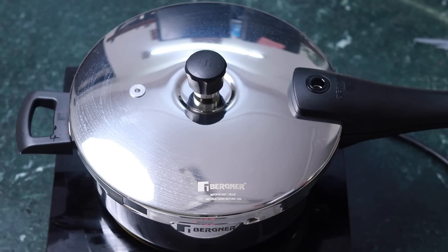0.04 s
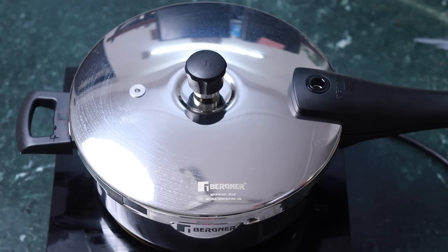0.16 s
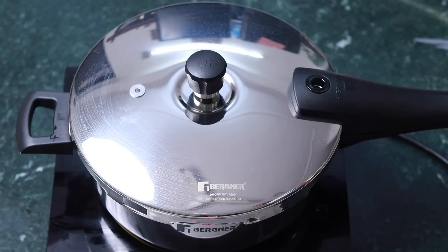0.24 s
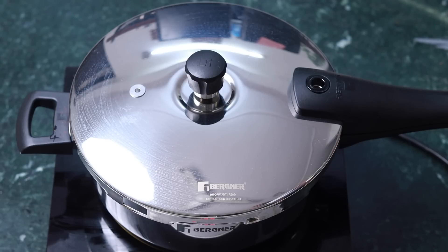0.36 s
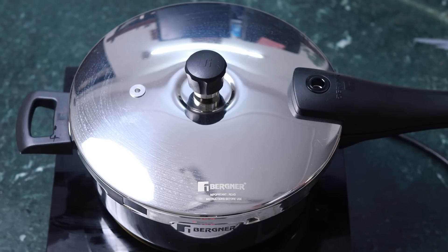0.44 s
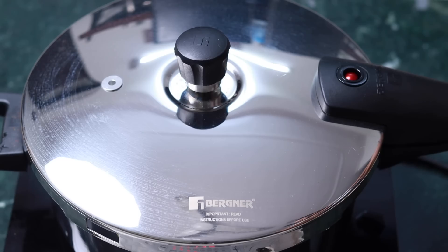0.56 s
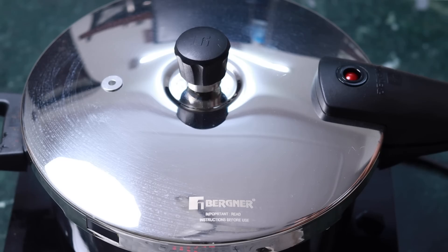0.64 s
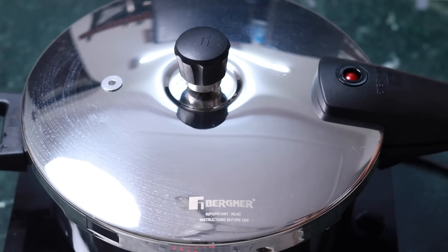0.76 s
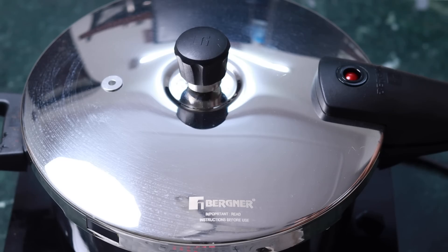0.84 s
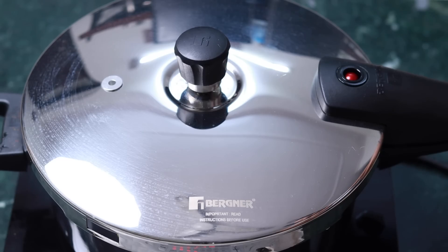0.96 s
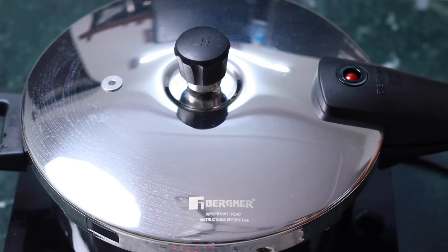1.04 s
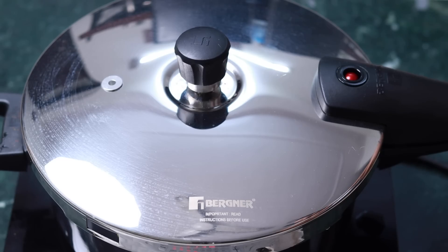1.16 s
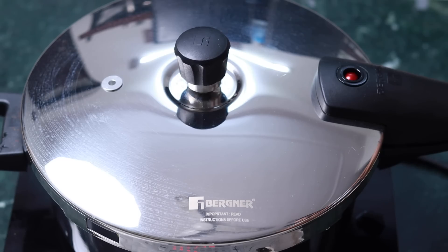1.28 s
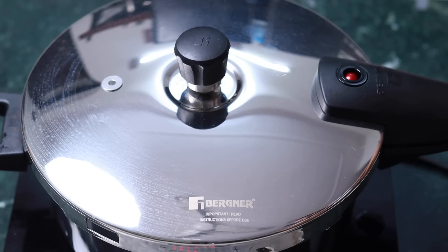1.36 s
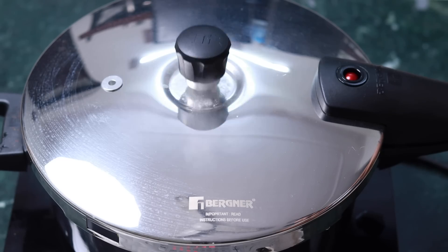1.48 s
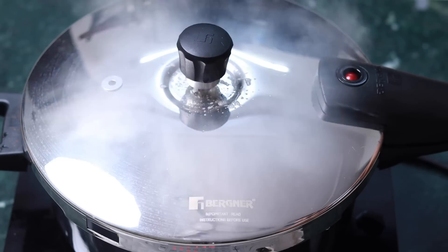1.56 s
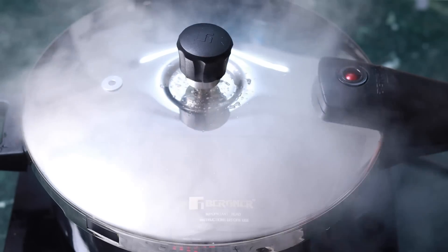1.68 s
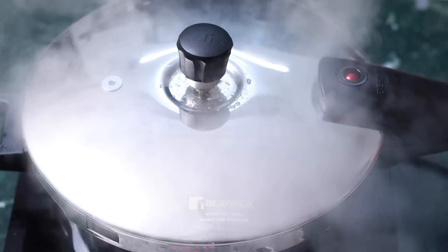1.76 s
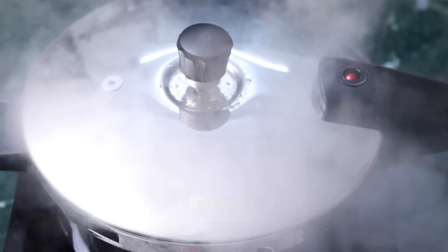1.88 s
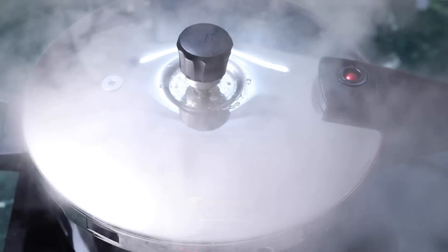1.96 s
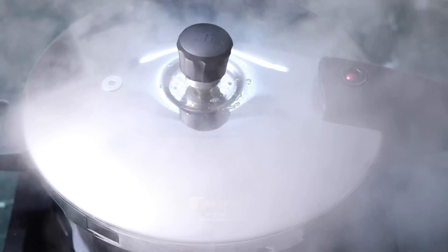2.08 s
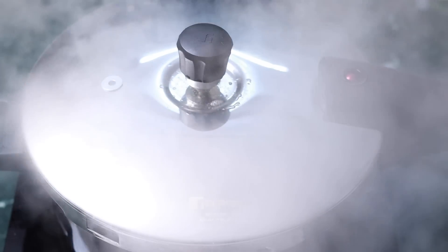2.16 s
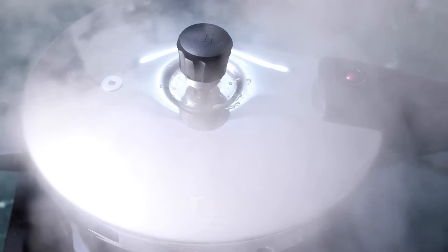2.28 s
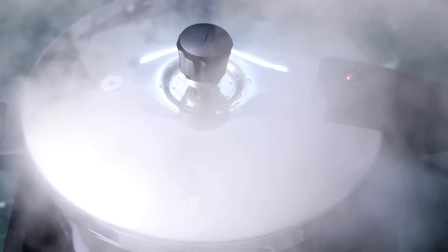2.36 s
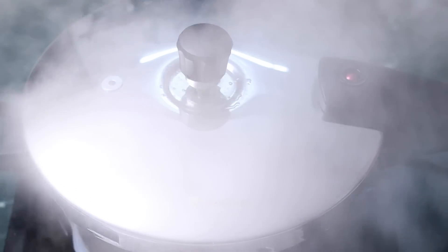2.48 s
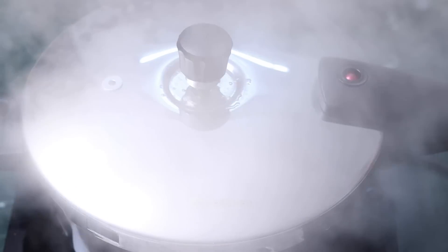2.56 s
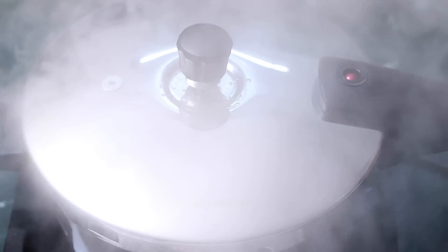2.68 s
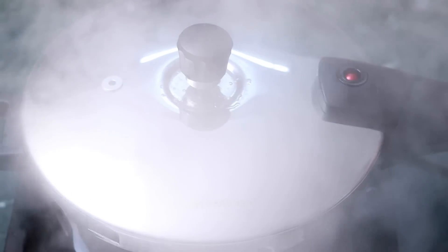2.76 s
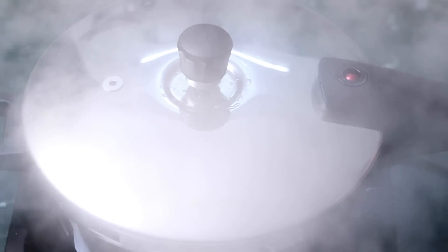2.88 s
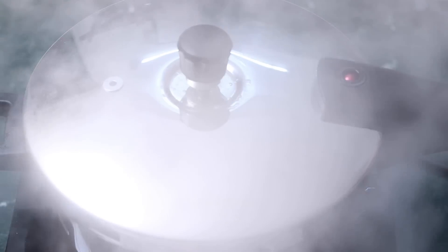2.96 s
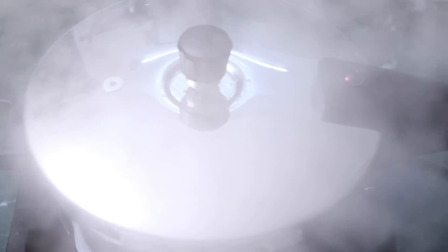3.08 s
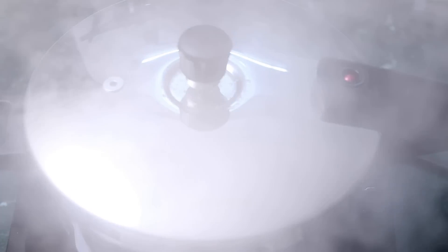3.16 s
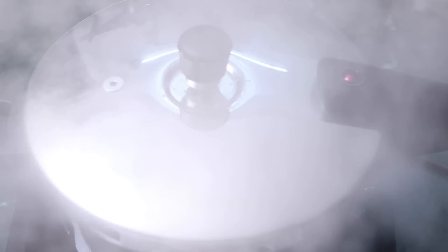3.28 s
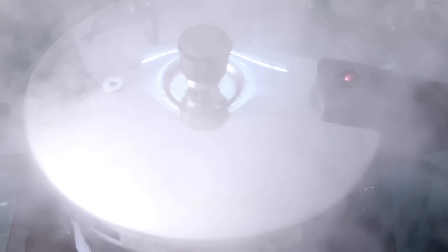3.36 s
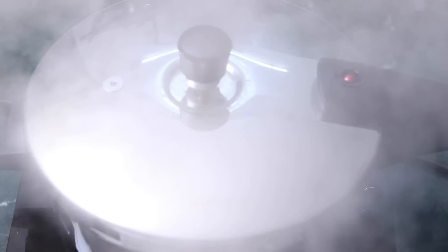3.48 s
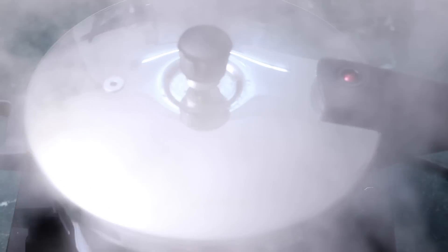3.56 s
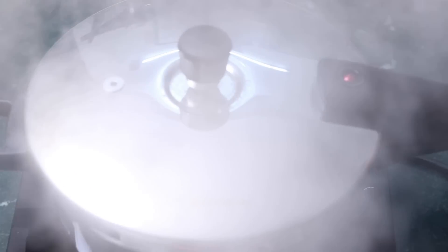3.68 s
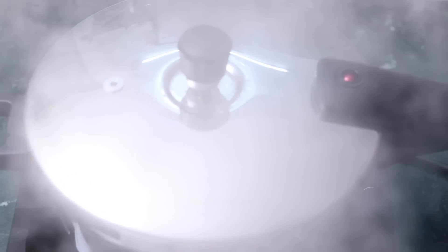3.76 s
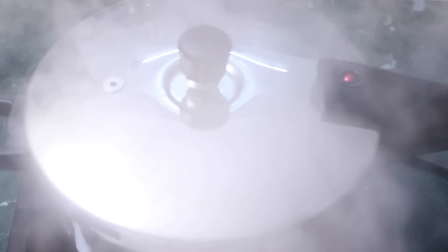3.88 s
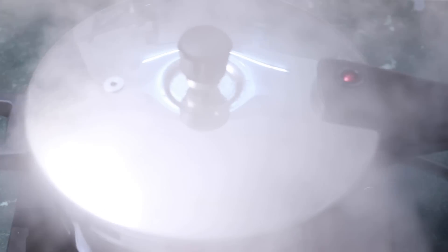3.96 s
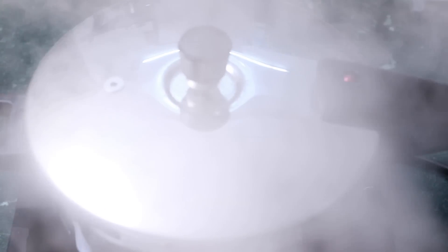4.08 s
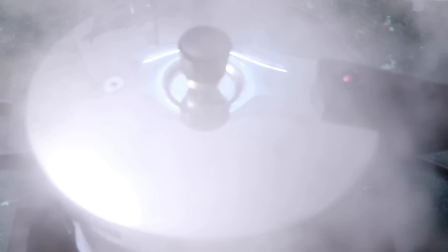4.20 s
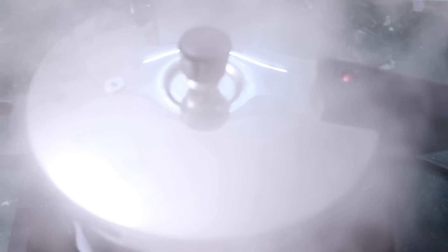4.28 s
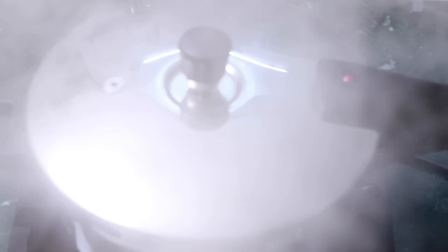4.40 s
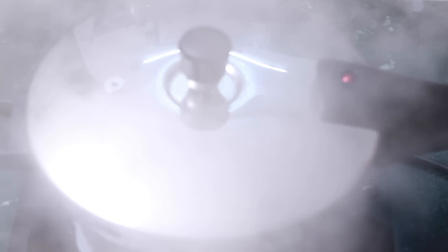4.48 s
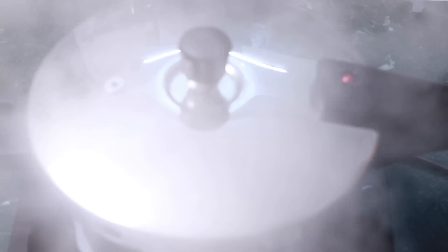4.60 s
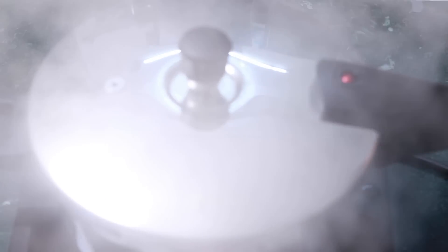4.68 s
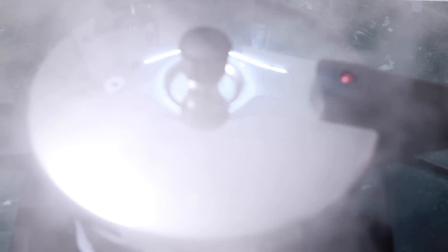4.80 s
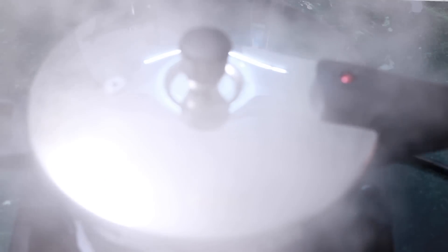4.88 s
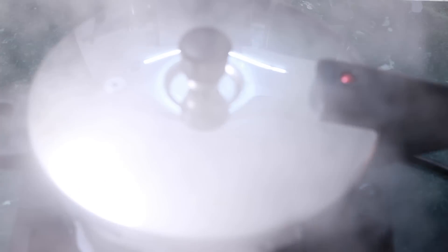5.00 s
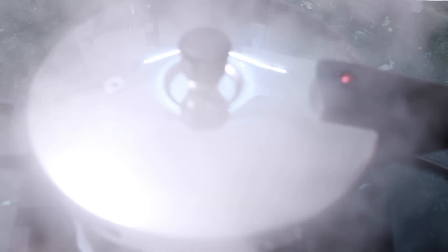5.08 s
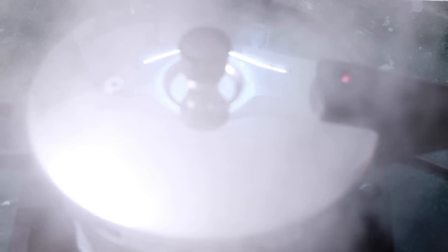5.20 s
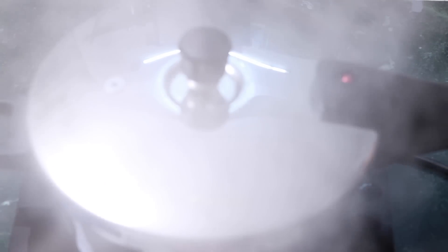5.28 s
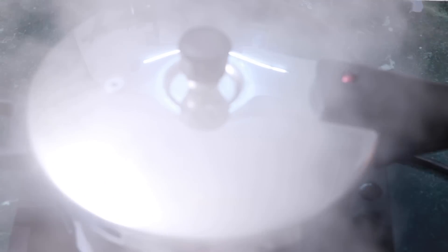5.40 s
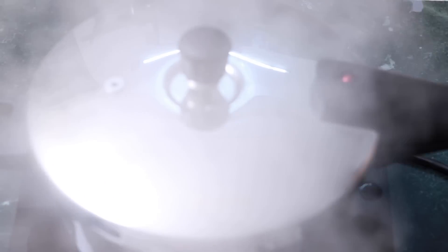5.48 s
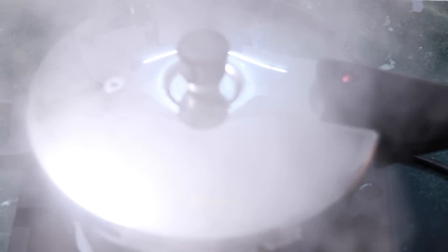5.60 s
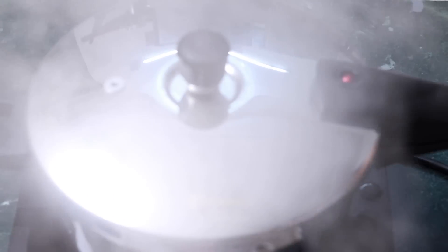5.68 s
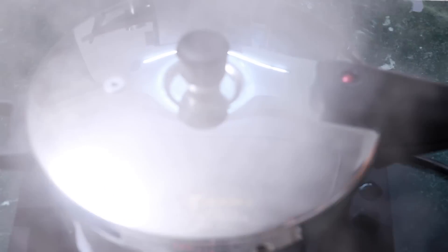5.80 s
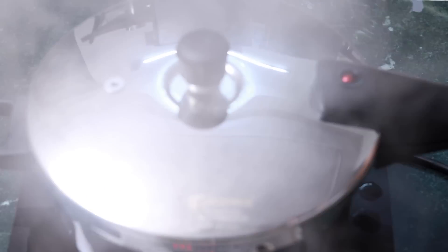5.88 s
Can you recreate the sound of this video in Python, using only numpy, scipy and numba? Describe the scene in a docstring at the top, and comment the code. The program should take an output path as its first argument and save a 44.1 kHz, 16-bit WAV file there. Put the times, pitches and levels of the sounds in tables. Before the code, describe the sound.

A pressure cooker valve gives small wet spits and thin puffs over the soft rush of a hob fan. With a dull metal knock it opens into a loud, bright hiss of steam, steady in level but changing colour a few times. After four seconds a quick metallic chatter shuts it off. The microphone is close over the lid, with a short echo from hard kitchen walls.

```python
"""A hob's fan rushes softly in a small kitchen, heard from close above the lid of a pressure cooker.
Wet steam spits past the weight that sits on the valve, until the weight lifts with a knock and a loud
jet blows for four seconds. The weight slowly turns, which shifts the hiss; then it rattles back onto
its seat and the jet dies away. The fan runs throughout."""
import sys
import numpy as np
from scipy import signal
from scipy.fft import rfft, irfft
from scipy.io import wavfile
from scipy.ndimage import uniform_filter1d
from numba import njit

SR = 44100
rng = np.random.default_rng(int(sys.argv[2]) if len(sys.argv) > 2 else 0)


def to_wav(sig):
    """Store sig (one row per channel, or 1-D mono) as 16-bit WAV at the path in sys.argv[1].

    Samples outside -1..1 are clipped; the rate is SR.
    """
    pcm = np.clip(np.atleast_2d(sig), -1, 1) * 32767
    pcm = np.round(pcm).astype(np.int16)
    wavfile.write(sys.argv[1], SR, pcm.T)  # frames by channels


N = 261938
TIME = np.arange(N) / SR

# Levels in the tables are relative: each layer gets its overall loudness later.
# The rush of the fan's draught and the boil: (pitch [Hz], level [dB])
HOB_RUSH = [(25, -35), (45, -24), (75, -8), (200, -6.5), (330, -1.5), (470, 5), (650, -3), (900, -6.5),
            (1250, -6), (2200, -14), (4000, -20.5), (8000, -33), (11000, -39.5), (15500, -61)]
# Hums of the pot and the hob: (pitch [Hz], width [Hz], level [dB])
HOB_HUMS = [(244.2, 8.6, -21.5), (419.9, 30, -3.5), (791, 5.7, -16.5)]
# Puffs of steam that nudge the weight, the last one lifting it: (time [s], level [dB])
STEAM_PUFFS = [(.385, -61), (.9, -55), (.965, -49), (1.16, -40), (1.29, -51), (1.56, -22.5)]
# Water spat through the seat, the rim that the weight rests on: (time [s], level [dB])
WATER_SPITS = [(.4773, -33), (.4847, -35), (.4974, -39), (.7188, -38), (.7344, -38), (.8734, -32),
               (.8934, -33), (1.1034, -38), (1.1314, -32), (1.1415, -29), (1.2795, -29.5), (1.293, -28),
               (1.4222, -36)]
# The broad hiss of the nearly closed seat: (pitch [Hz], level [dB])
LEAK_HISS = [(120, -40), (500, -3), (2200, -15), (3600, -29), (4500, -6), (6000, -5.5), (8200, -0.5),
             (10000, -22), (12800, -13), (15500, -24)]
# Pitches at which the seat rings: (pitch [Hz], width [Hz], steam level [dB], spit level [dB])
SEAT_RINGS = [(3050, 600, -4.5, 4.5), (3360, 650, -4.5, -3), (6440, 820, -3.5, -20)]
# The jet's roar at the weight's first, middle and last position: (pitch [Hz], level [dB])
ROAR_FIRST = [(100, -38), (500, -17), (1200, -9.5), (1900, -8), (2200, -8.5), (2480, -7), (2750, 2),
              (4600, 1), (5700, 1), (8000, -2.5), (10100, -13), (11400, -11.5), (12400, -6), (15500, -9)]
ROAR_MIDDLE = [(100, -32), (450, -16), (1050, -12.5), (1470, -18.5), (1780, -7.5), (2300, -3.5), (2850, -2),
               (4400, -6), (5700, 0), (7800, -2), (8800, -14.5), (10500, -14), (13400, -7.5),
               (15500, -13.5)]
ROAR_LAST = [(100, -41), (450, -20), (1000, -11), (1450, -18), (1780, -8.5), (2300, -6.5), (2800, 1.5),
             (4400, 1.5), (6100, 3.5), (7500, -2.5), (8700, -7), (10200, -13), (13400, -7), (15500, -13)]
# Narrow rings of the gap under the weight at those positions: (pitch [Hz], width [Hz], level [dB])
GAP_RINGS_FIRST = [(2755, 70, -23.5), (4460, 360, -10.5), (4950, 400, -11.5)]
GAP_RINGS_MIDDLE = [(2660, 190, -13.5), (3017, 210, -8.5), (4705, 120, -13.5), (5440, 360, -19),
                    (7550, 520, -12)]
GAP_RINGS_LAST = [(1815, 260, -23), (2840, 170, -32), (5900, 550, -19), (7160, 120, -12)]
# The gap's two broad rings and a dip in its hiss, one row for each position:
# (low pitch [Hz], low level [dB], high pitch [Hz], high level [dB], dip pitch [Hz], dip depth [0-1])
GAP_SHAPES = [(3320, -3.5, 6870, -2.5, 4000, 0.35), (3720, -4.5, 7100, -8.5, 4860, 0.18),
              (3570, -5, 6640, -17, 5300, .25)]
# The weight hits its stop, and later chatters back down: (time [s], level [dB])
WEIGHT_KNOCKS = [(1.569, -12), (5.61, -22), (5.634, -21), (5.655, -15), (5.679, -19), (5.699, -20),
                 (5.721, -27), (5.741, -27)]
# The notes of the weight and lid: (pitch [Hz], level [dB], time to fade by 60 dB [s])
LID_NOTES = [(279, -24, 0.18), (354, -5, 0.026), (473, -9, 0.12), (590, 4, 0.011), (758, -5, 0.15),
             (817, -4.5, 0.099), (1015, -12, 0.046), (1236, -15.5, 0.23), (1537, -11, 0.07)]
# Each turn carries the weight to its next position: (time at mid-turn [s], easing time [s])
WEIGHT_TURNS = [(3.43, 0.17), (4.64, 0.033)]
# The weight tilts on the jet for a moment: (time [s], half length [s], extra flow [dB],
# pitch rise [fraction], extra low ring [dB], extra high ring [dB])
WEIGHT_TILTS = [(3.3, 0.34, 0.8, .005, -1, 4), (3.544, 0.071, -0.7, 0.061, 2.5, 2),
                (3.71, 0.084, 0, 0.036, 3.5, -9), (5.58, 0.022, 0, 0.085, 2.5, -3)]

HOB_DB, HOB_SWELL_S, HOB_SWELL_DB = -43, 0.56, 7.5  # the hob swells at first, then holds
FAN_HZ, FAN_DB, HUM_SWELL_DB = 732, -10.5, 20
SEAL_S, SEEP_DB = 0.45, -67.5  # once the pot seals, steam seeps under the weight
PUFF_RISE_DB_PER_S, PUFF_FALL_DB_PER_S = 205, 252
SPRAY_PER_S, SPRAY_DB = 45, -65
OPEN_S, OPEN_RISE_S, JET_DB = 1.551, 0.018, -16
CLOSE_S, CLOSE_DB_PER_S = 5.619, 320
ROCKING = 0.013  # the weight rocks, so the broad rings waver by this fraction of their pitch
BLAST_CUT_DB, SETTLE_S = 3, 0.46  # the broad rings start weaker and grow as the weight settles
LOUD_DB, SQUEEZE_RATIO, TURN_DOWN_S, RECOVER_S = -24, 2.45, 0.25, 0.86  # automatic volume control
TOP_HZ = 15600


def undb(db):
    """Turn decibels into a number to multiply by."""
    return 10 ** (np.asarray(db) / 20)


def unit(x):
    """Scale a signal to an average strength (rms) of 1."""
    return x / np.sqrt(np.mean(x ** 2))


def noise():
    """White noise: an even hiss."""
    return rng.standard_normal(N)


def walk(rate):
    """Glide to a new random value `rate` times a second; the typical size is 1."""
    hold = max(int(SR / rate), 1)
    return unit(uniform_filter1d(noise()[np.arange(N) // hold], hold))


def step(s, rise_s):
    """A smooth step from 0 to 1 around time s."""
    return .5 + .5 * np.tanh((TIME - s) / (2 * rise_s))


def bump(s, half_s):
    """A smooth swell from 0 to 1 and back around time s."""
    return np.exp(-((TIME - s) / half_s) ** 2)


def bursts(rows, decay_s):
    """A loudness curve that jumps at each (time [s], level [dB]) and dies away."""
    return sum(undb(db) * (TIME >= s) * np.exp(-np.abs(TIME - s) / decay_s) for s, db in rows)


def colour(x, points):
    """Shape the tone of x along a curve of (pitch [Hz], level [dB]) points."""
    hz, db = np.transpose(points)
    size = 4096
    bins = np.maximum(np.fft.rfftfreq(size, 1 / SR), 1)
    gain = undb(np.interp(np.log(bins), np.log(hz), db))
    cepstrum = irfft(np.log(gain))
    cepstrum[1:size // 2] *= 2  # fold it so the filter never sounds ahead of its input
    cepstrum[size // 2 + 1:] = 0
    return signal.fftconvolve(x, irfft(np.exp(rfft(cepstrum))))[:N]


@njit
def band_pass(x, hz, width):
    """Keep the part of x near a pitch that may move (a state-variable filter)."""
    y, band, low = np.empty(len(x)), 0., 0.
    for i in range(len(x)):
        tuning, damping = np.tan(np.pi * hz[i] / SR), width / hz[i]
        swing = (band + tuning * (x[i] - low)) / (1 + tuning * (tuning + damping))
        band, low = 2 * swing - band, low + 2 * tuning * swing
        y[i] = damping * swing
    return y


def resonate(x, hz, width):
    """Make x ring around one pitch by filtering it twice."""
    centre = hz * np.ones(N)
    return band_pass(band_pass(x + 1e-18, centre, float(width)), centre, float(width))


def hob():
    """Draught and boil make a soft rush with the fan blades' tone in it; a hum rises as the pot seals."""
    rush = unit(colour(noise(), HOB_RUSH)) * undb(0.23 * walk(24))
    hum = sum(undb(db) * unit(resonate(noise(), hz, width)) for hz, width, db in HOB_HUMS)
    hum = hum * undb(-HUM_SWELL_DB * (1 - step(SEAL_S, rise_s=0.02)))
    blade_hz = FAN_HZ * (1 + 0.003 * walk(13))
    blades = unit(np.sin(2 * np.pi * np.cumsum(blade_hz) / SR) * undb(2 * walk(6.9)))
    early = np.maximum(1 - TIME / HOB_SWELL_S, 0)
    return undb(HOB_DB - HOB_SWELL_DB * early) * (undb(0.5) * rush + hum + undb(FAN_DB) * blades)


def sputter(rate, drop_db, decay_s, flutter_db, spread_db=3):
    """The loudness of wet steam: it flutters, and surges briefly as each droplet is torn apart."""
    drops = (rng.random(N) < rate / SR) * undb(drop_db + spread_db * np.clip(noise(), -2, 2))
    surge = signal.lfilter([1], [1, -np.exp(-2 / (decay_s * SR))], drops ** 2)
    return unit(np.sqrt(1 + surge) * undb(flutter_db * walk(70)))


def seat_flow(seated):
    """Steam passing the resting weight: a steady seep, plus puffs that swell and fade."""
    flow = seated * undb(SEEP_DB)
    for s, db in STEAM_PUFFS:
        fade_db = np.maximum(PUFF_RISE_DB_PER_S * (s - TIME), PUFF_FALL_DB_PER_S * (TIME - s))
        flow = np.hypot(flow, undb(db - fade_db))
    return flow


def leak():
    """Steam seeps under the weight with a thin hiss and ticking spray; spits make its hollow chirp."""
    seated = step(SEAL_S, rise_s=.02) * (1 - step(OPEN_S, OPEN_RISE_S))
    seep = seat_flow(seated) * sputter(rate=99, drop_db=-12, decay_s=0.0017, flutter_db=1.5)
    spit = undb(-14.5) * bursts(WATER_SPITS, decay_s=0.0059)
    hiss = unit(colour(noise(), LEAK_HISS)) * (undb(-5) * seep + undb(-3) * spit)
    hollow = 0
    for hz, width, steam_db, spit_db in SEAT_RINGS:
        strength = undb(steam_db) * seep + undb(spit_db) * spit
        hollow = hollow + strength * unit(resonate(noise(), hz, width))
    ticks = sputter(rate=SPRAY_PER_S, drop_db=11, decay_s=.003, flutter_db=3)
    spray = undb(SPRAY_DB) * seated * ticks * resonate(noise(), 10000, width=14000)
    return hiss + hollow + spray


def jet_roar(position, wet):
    """Swirling steam roars and rings the gap; one tone fades into the next as the weight turns."""
    tones = [(ROAR_FIRST, GAP_RINGS_FIRST), (ROAR_MIDDLE, GAP_RINGS_MIDDLE), (ROAR_LAST, GAP_RINGS_LAST)]
    steam = 0
    for k, (points, rings) in enumerate(tones):
        share = np.maximum(1 - np.abs(position - k), 0)
        swirls = wet * noise()
        ringing = sum(undb(db) * unit(resonate(swirls, hz, width)) for hz, width, db in rings)
        roar = unit(colour(wet * noise(), points))
        steam = steam + np.sqrt(share) * unit(roar + ringing)
    return steam


def jet():
    """Wet steam blasts out while the weight is up; its rings shift as the weight turns and tilts."""
    position = sum(step(s, rise_s) for s, rise_s in WEIGHT_TURNS)
    gap = [np.interp(position, np.arange(len(column)), column) for column in np.transpose(GAP_SHAPES)]
    low_hz, low_db, high_hz, high_db, dip_hz, dip_depth = gap
    tilt = sum(np.outer(effects, bump(s, half_s)) for s, half_s, *effects in WEIGHT_TILTS)
    flow_db, pitch_rise, low_tilt_db, high_tilt_db = tilt
    wet = sputter(rate=170, drop_db=0, decay_s=0.0011, flutter_db=.5)
    roar = jet_roar(position, wet)
    pitch = 1 + pitch_rise + ROCKING * walk(13)
    low_ring = undb(low_db + low_tilt_db) * unit(resonate(wet * noise(), low_hz * pitch, width=790))
    high_gain = undb(high_db + high_tilt_db + 1.3 * walk(37))
    high_ring = high_gain * unit(resonate(wet * noise(), high_hz * pitch, width=1300))
    cut_db = BLAST_CUT_DB * np.exp(-np.maximum(TIME - OPEN_S, 0) / SETTLE_S)
    steam = roar + undb(-cut_db) * (low_ring + high_ring)
    steam = steam - dip_depth * band_pass(steam, dip_hz, 500.0)
    closing_db = CLOSE_DB_PER_S * np.maximum(TIME - CLOSE_S, 0)
    flow = step(OPEN_S, OPEN_RISE_S) * undb(JET_DB - closing_db)
    return steam * flow * undb(flow_db + 0.15 * walk(17))


def knocks():
    """Each blow of the weight rings the lid briefly, with a dull thud."""
    ring = np.zeros(N)
    for s, knock_db in WEIGHT_KNOCKS:
        start = int(s * SR)
        age = TIME[:N - start]
        contact = 1 - np.exp(-age / 0.0023)  # the wet seat cushions the blow
        chance = rng.standard_normal((len(LID_NOTES), 2))
        for (hz, db, fade_s), (detune, phase) in zip(LID_NOTES, chance):
            swing = contact * np.sin(2 * np.pi * hz * (1 + 0.0072 * detune) * age + np.pi * phase)
            ring[start:] += undb(knock_db + db) * swing * np.exp(-np.log(1000) * age / fade_s)
    thud = resonate(bursts(WEIGHT_KNOCKS, decay_s=0.0093) * noise(), 820, width=1030)
    return undb(-3.5) * ring + undb(6.5) * thud


def billow():
    """A cloud of steam brushes the microphone with a faint, low rumble."""
    return undb(-47) * bump(s=3.85, half_s=.2) * unit(resonate(noise(), 89, width=160))


def kitchen(x, fade_s, echo_db, gap_s):
    """Close, hard walls send back a blur of echoes that falls by 60 dB in fade_s."""
    age = TIME[:SR // 2]
    tail = rng.standard_normal(len(age)) * np.exp(-np.log(1000) * age / fade_s) * (age > gap_s)
    return undb(echo_db) * signal.fftconvolve(x, tail / np.linalg.norm(tail))[:N]


def scene():
    """The valve and its echoes over the hob and the billow, alike in both ears."""
    valve = leak() + jet() + knocks()
    echoes = kitchen(valve, fade_s=0.38, echo_db=-7.5, gap_s=0.002)
    sound = hob() + valve + echoes + billow()
    return np.array([sound, sound])


@njit
def follow(x, rise, fall):
    """Trail smoothly behind x, at one speed going up and another going down."""
    y, level = np.empty(len(x)), 0.
    for i in range(len(x)):
        level += (x[i] - level) * (rise if x[i] > level else fall)
        y[i] = level
    return y


def record(dry):
    """The recorder turns itself down under the loud jet and cuts the highest treble."""
    level_db = 10 * np.log10(np.abs(uniform_filter1d(dry[0] ** 2, size=1024)) + 1e-12)
    excess_db = np.maximum(level_db - LOUD_DB, 0) * (1 - 1 / SQUEEZE_RATIO)
    cut_db = follow(excess_db, 1 / (TURN_DOWN_S * SR), 1 / (RECOVER_S * SR))
    treble_cut = signal.ellip(12, .1, 85, TOP_HZ, fs=SR, output="sos")
    return signal.sosfilt(treble_cut, dry * undb(-cut_db))


dry = scene()
out = record(dry)
to_wav(out)
```